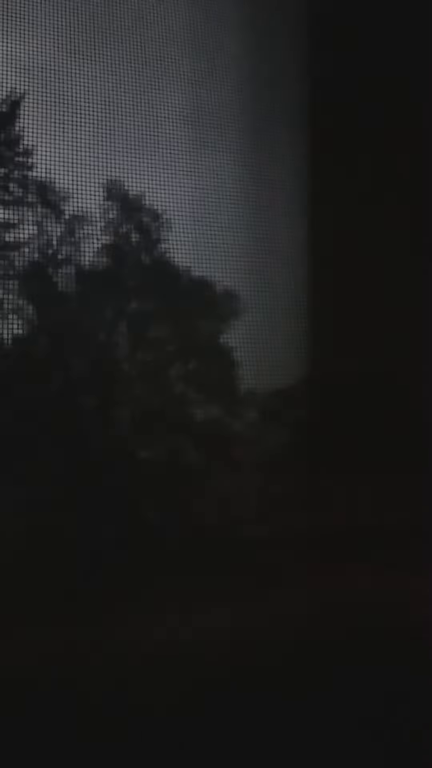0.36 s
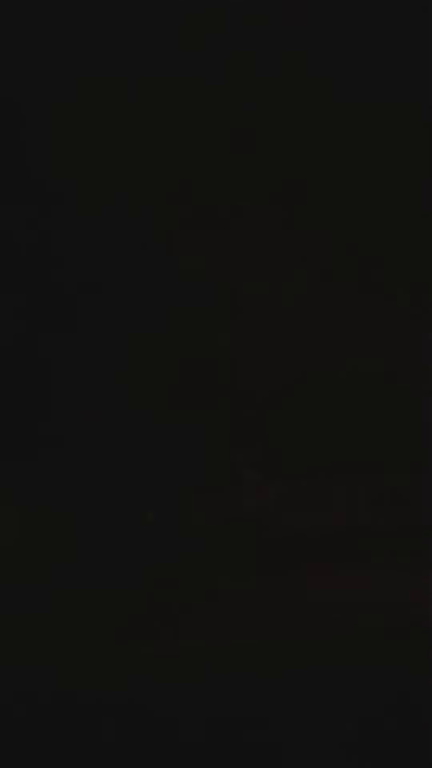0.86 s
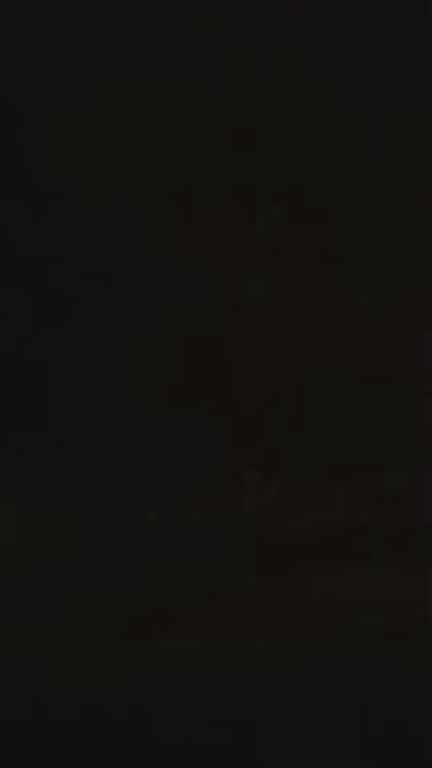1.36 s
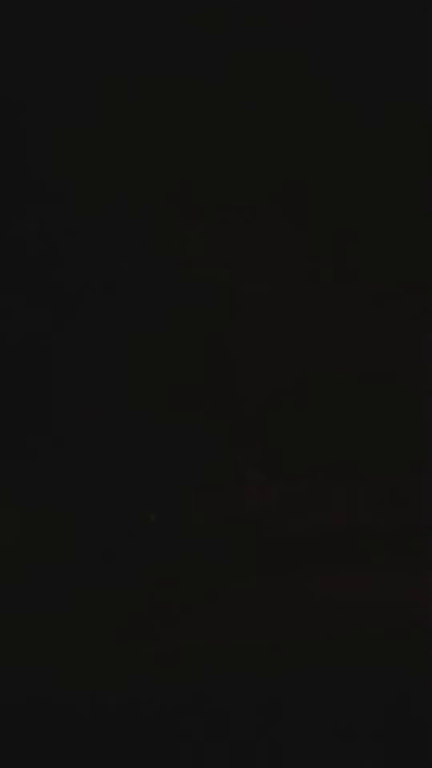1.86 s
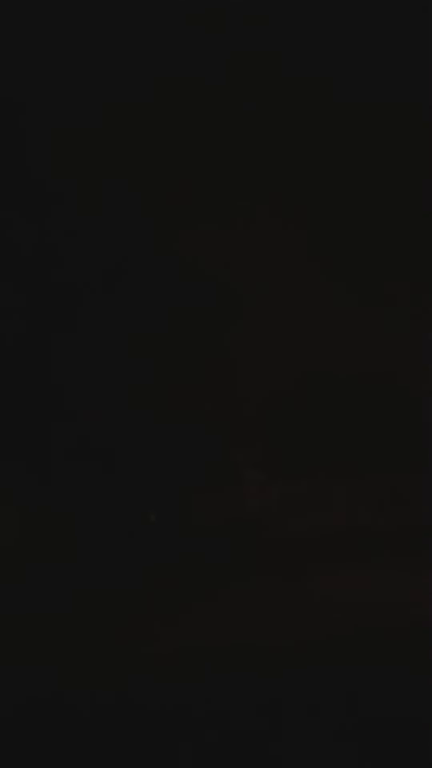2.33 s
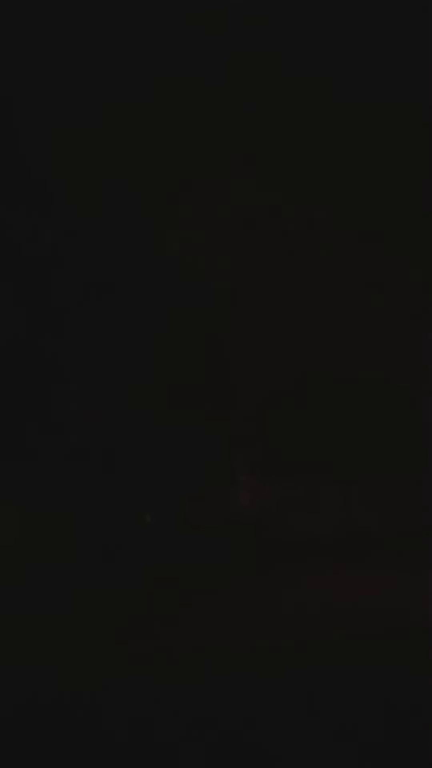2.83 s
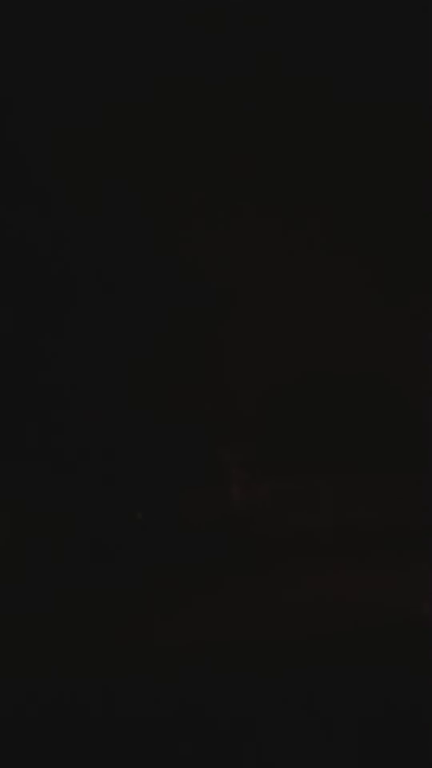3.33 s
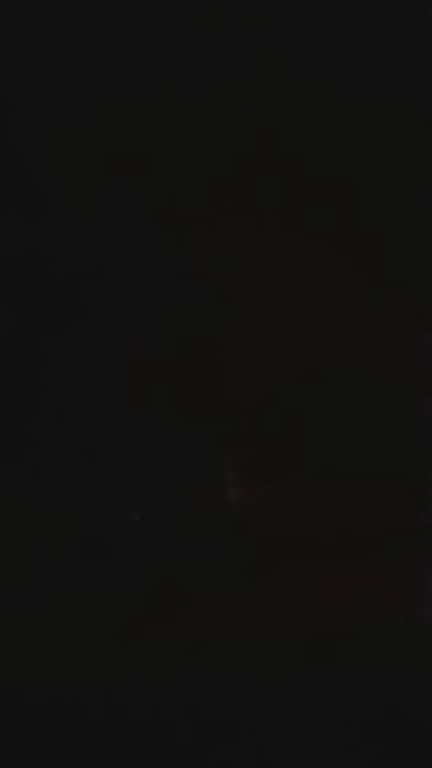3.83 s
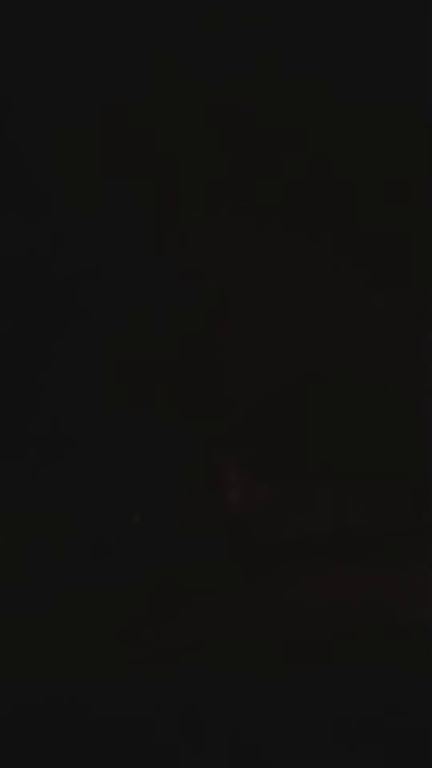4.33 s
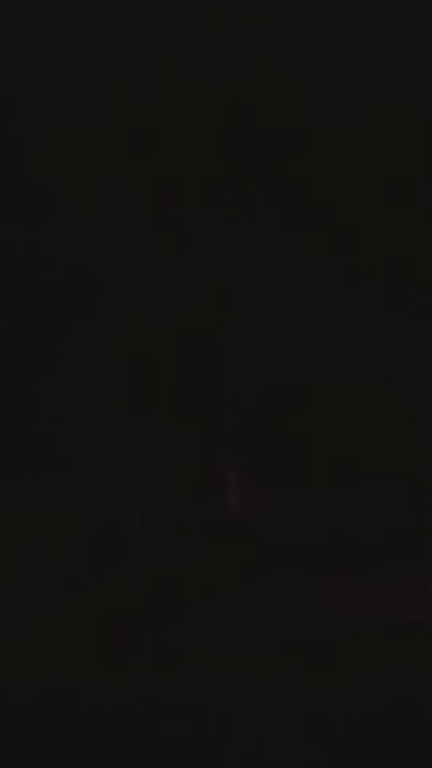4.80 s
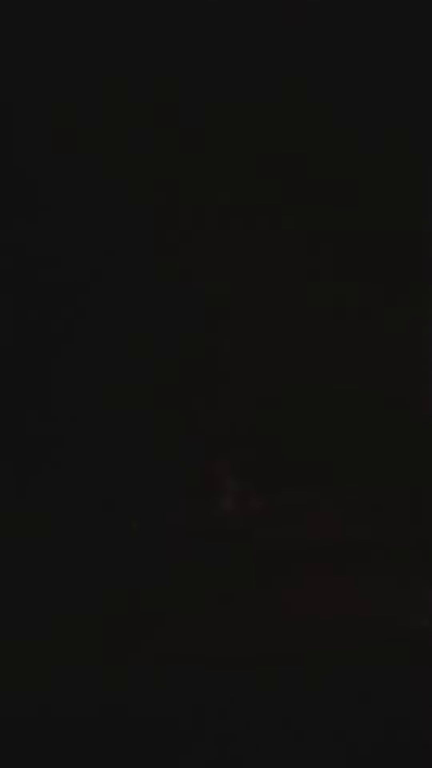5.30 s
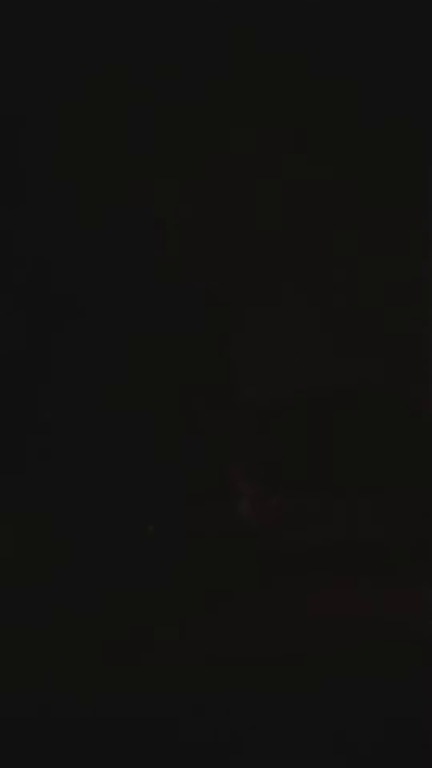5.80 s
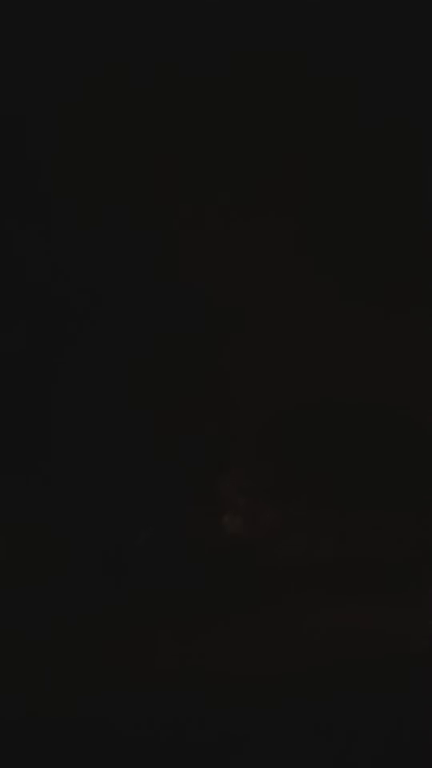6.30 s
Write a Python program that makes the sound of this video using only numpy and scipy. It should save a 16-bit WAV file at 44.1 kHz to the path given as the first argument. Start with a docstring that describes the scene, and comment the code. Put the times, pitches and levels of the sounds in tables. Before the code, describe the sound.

Night outdoors, heard in stereo from under a porch roof. Distant thunder is already rumbling at 0 s with a brief dull clap, deep and nearly centred, its highs lost to distance. Muffled thuds merge into an uneven roll, with bumps around 0.6 to 0.9 and 1.2 to 1.6 s, building to its fullest at about 2.8 to 3.5 s. It then sinks irregularly, still fluttering, before surging again after 6.2 s. Nearby, sparse raindrops click and splash, noticeably at 0.4, 2.0, 3.4, 4.5, 5.8 and 6.1 s, with small hollow taps at 0.3, 1.1, 1.8, 2.5 and 4.2 s. A very faint, fine rain hiss lies mostly left over soft microphone noise. From about 5.1 s spray swells, brightest at the end. Around 6.34 s a much stronger hollow drop knocks on the left; it stops at 6.4 s, still swelling.

```python
"""Thunder over a wet garden

Distant thunder rolls at night, heard from under a porch roof: dulled shock waves merge into a rumble.
Stray drops splash, click and tap nearby, each noise or a ring under a fast decay. A fine hiss of rain,
dense random clicks through a spectrum, lies mostly left and swells towards the end, over the noise
of two microphones."""
import sys
import numpy as np
from scipy import signal
from scipy.fft import rfft, irfft
from scipy.io import wavfile

SR = 44100
rng = np.random.default_rng(int(sys.argv[2]) if len(sys.argv) > 2 else 0)


def boost(x):
    """Linear amplitude factor 10**(x/20) for a level x in decibels (scalar or array-like)."""
    u = np.asarray(x, float) / 20
    return 10 ** u


def persist_wave(psi):
    """Save psi, clipped to +-1, as 16-bit WAV."""
    counts = np.round(np.clip(psi, -1, 1) * 32767).astype(np.int16)
    wavfile.write(sys.argv[1], SR, np.atleast_2d(counts).T)


N = 282945


def rms_one(x):
    """Scale to unit power."""
    return x / np.sqrt(np.mean(x ** 2) + 1e-20)


def in_time(rows):
    """Columns of a curve at every sample; the first column is seconds."""
    s, *columns = np.transpose(rows)
    return [np.interp(np.arange(N) / SR, s, c) for c in columns]


def at_hz(points, hz):
    """Read a spectrum on a log frequency axis."""
    points_hz, values = np.transpose(points)
    return np.interp(np.log(hz), np.log(points_hz), values)


def panned(left_minus_right_db):
    """Left and right gains for a level difference."""
    half_db = left_minus_right_db / 2
    return boost(np.array([half_db, -half_db]).reshape(2, -1))


def drift(corner_hz):
    """Slow random curve of unit rms: noise through two equal poles, at SR / 40."""
    r = np.exp(-2 * np.pi * corner_hz * 40 / SR)
    noise = rng.standard_normal(N // 40 + 2002)
    slow = rms_one(signal.lfilter([1], [1, -2 * r, r * r], noise)[2000:])
    return np.interp(np.arange(N) / 40, np.arange(len(slow)), slow)


def coloured(x, spectrum):
    """Give a broadband signal the spectrum; nothing far outside its ends."""
    hz = np.maximum(np.fft.rfftfreq(N, 1 / SR), 1)
    below, above = (spectrum[0][0] / 2, -70), (spectrum[-1][0] * 2, -70)
    return irfft(rfft(x) * boost(at_hz([below] + list(spectrum) + [above], hz)), N)


def grains(per_s, spread_db, channels):
    """Random clicks of uneven size and sign, unit rms."""
    shape = (channels, N)
    sizes = boost(spread_db * np.minimum(rng.exponential(1, shape), 4))
    signs = rng.choice([-1, 1], shape)
    return rms_one(sizes * signs * (rng.random(shape) < per_s / SR))


def dying(t60_s, rise_s):
    """Envelope of a hit: soft quick rise, exponential fall."""
    t = np.arange(SR // 3) / SR
    return (1 - np.exp(-t / rise_s)) ** 2 * boost(-60 * t / max(t60_s, .01))


def add(out, s, sound):
    """Mix a sound in at its time."""
    i = round(s * SR)
    out[:, i:i + sound.shape[1]] += sound[:, :N - i]


def ringing(noise, hz, q):
    """Noise twice through a resonance, unit rms."""
    b, a = signal.iirpeak(hz, q, fs=SR)
    return rms_one(signal.lfilter(b, a, signal.lfilter(b, a, noise)))


def hiss(spectrum):
    """Thousands of tiny drops a second, unrelated left and right."""
    return rms_one(coloured(grains(7000, 2.8, channels=2), spectrum))


def self_noise():
    """Steady coloured noise of each microphone, unrelated left and right."""
    # Each row: frequency in Hz, relative density in dB per Hz.
    noise_spectrum = [(300, 9), (1500, -8), (3000, -8), (8000, -11.5), (15500, -10.5)]
    return boost(-73.5) * rms_one(coloured(rng.standard_normal((2, N)), noise_spectrum))


def shower():
    """The far rain flickers and sways slightly; coarser drops come in flurries on both sides."""
    # Rain hiss, uneven and rising at the end. Each row: time in seconds, level in dB.
    rain_level = [(0.0, -80.5), (.9, -83), (1.23, -80.5), (1.6, -81), (1.92, -85.5), (2.45, -80),
                  (2.9, -82.5), (3.4, -80.5), (3.95, -79), (4.35, -81), (4.9, -82.5), (5.1, -80),
                  (5.5, -79), (6.42, -72)]
    # Fine rain, then coarser drops. Each row: frequency in Hz, relative density in dB per Hz.
    rain_spectrum = [(4500, -24), (5600, -13), (6300, -2), (7500, -1), (8100, -10), (8700, -23.5)]
    patter_spectrum = [(4200, -18), (5000, -5), (5700, 0), (6300, -7.5)]
    # Flurries of coarser drops. Each row: start in seconds, level in dB.
    flurry_hits = [(.42, -82), (.58, -91), (.69, -85), (.745, -86), (1.035, -84), (1.2, -80), (1.32, -85),
                   (1.54, -77), (1.98, -83), (2.2, -83), (2.53, -78), (3.14, -77), (3.21, -81), (3.39, -81),
                   (3.94, -87), (4.485, -75), (5.15, -84)]
    pan_db, sway_db, flicker_db = 10, 1.0, .6
    flurry_t60_s, flurry_rise_s, patter_floor_db = 0.35, 0.0053, -90

    level_db, = in_time(rain_level)
    flicker = flicker_db * np.array([drift(9.2), drift(6)])
    fine = hiss(rain_spectrum) * boost(level_db + flicker) * panned(pan_db + sway_db * drift(1.7))
    flurries = np.full((1, N), boost(patter_floor_db))
    for s, flurry_db in flurry_hits:
        add(flurries, s, boost(flurry_db) * dying(flurry_t60_s, flurry_rise_s)[None])
    return fine + hiss(patter_spectrum) * flurries


def gust():
    """Spray swells from nothing; its finest part comes last and almost only from the left."""
    # A gust of spray draws near. Each row: time in seconds, level in dB.
    gust_level = [(5.1, -86), (5.3, -82), (5.46, -76), (5.67, -74.5), (5.81, -71.5), (5.94, -75),
                  (6.15, -72.5), (6.31, -69.5), (6.42, -65)]
    # Main spray, then its finest part. Each row: frequency in Hz, relative density in dB per Hz.
    gust_spectrum = [(1000, -11), (1600, -7.5), (1850, -5.5), (2100, -15.5), (3200, -9), (4400, -8),
                     (4850, 1.5), (5700, 1), (6500, 0), (7600, -8), (8700, -4.5), (9200, -17)]
    spray_spectrum = [(9300, -30), (10300, -5), (11400, -1), (12900, -5), (13400, -16), (15500, -10)]
    spray_end_db, spray_rise_db_per_s, spray_floor_db = -76, 54, -96

    level_db, = in_time(gust_level)
    t = np.arange(N) / SR
    flicker_db = 0.71 * np.array([drift(9.6), drift(8.3)])
    main = hiss(gust_spectrum) * boost(level_db + flicker_db) * panned(8.5)
    swell = boost(spray_floor_db) + boost(spray_end_db - spray_rise_db_per_s * (t[-1] - t))
    finest = hiss(spray_spectrum) * swell * panned(20.6)
    started = np.clip(t - gust_level[0][0], 0, .15) / .15
    return started * (main + finest)


def ticks():
    """Small hard drops: a click through a steep band, with a few milliseconds of rattle after it."""
    # Each row: start in seconds, peak in dB ahead of panning, low edge in Hz, high edge in Hz,
    # left minus right in dB.
    tick_hits = [(0.411, -65, 1000, 5500, 2), (1.04, -64.5, 1250, 1720, 5), (1.331, -59.5, 5860, 7300, 13),
                 (1.637, -59, 1330, 1630, 1.5), (1.985, -55, 2900, 6900, 5), (2.027, -63, 5200, 7200, 2),
                 (3.3947, -56.5, 3640, 7800, 13), (3.435, -64, 4600, 5800, 6), (3.8, -59.5, 6440, 8100, 2),
                 (3.832, -60, 7150, 8850, 5), (5.783, -51, 1400, 7500, 5), (6.0806, -53, 6400, 8150, 11),
                 (6.335, -59.5, 1300, 4200, -13)]
    out = np.zeros((2, N))
    for s, peak_db, low_hz, high_hz, pan_db in tick_hits:
        strike = 0.22 * rng.standard_normal((2, SR // 3)) * dying(0.008, .0001)
        strike[:, 0] = 1
        band = signal.butter(3, [low_hz, high_hz], "band", fs=SR, output="sos")
        click = signal.sosfilt(band, strike)
        add(out, s, click / np.abs(click).max() * boost(peak_db) * panned(pan_db))
    return out


def taps():
    """Heavy drops on a hollow thing: it rings a few cycles, with a rough tail from the walls."""
    # Each row: start in seconds, level in dB, ring in Hz, rough tail against the ring in dB,
    # left minus right in dB.
    tap_hits = [(.309, -52, 700, -5, -2.5), (1.098, -58, 560, -9, .3), (1.801, -55, 608, -9, -3),
                (2.528, -54, 700, -7, -3.5), (4.189, -58, 820, -5, -2.5), (4.646, -60, 805, -5, -2.5),
                (4.862, -60, 717, -5, 1.5), (6.222, -57, 742, -6, -5), (6.3369, -35, 530, -30, -15)]
    out, t = np.zeros((2, N)), np.arange(SR // 3) / SR
    envelope = dying(.016, .0017)
    for s, level_db, hz, tail_db, pan_db in tap_hits:
        ring = np.sin(2 * np.pi * hz * t) * envelope / envelope.max()
        tail = ringing(rng.standard_normal((2, len(t))), hz, 2.39) * dying(0.26, 0.0027)
        add(out, s, (ring + boost(tail_db) * tail) * boost(level_db) * panned(pan_db))
    return out


def drops():
    """A burst of noise dying under the porch roof: two rings of the surface hit, and a broad splash."""
    # Each row: start in seconds, level in dB, high ring in Hz, high ring against low in dB, T60 in seconds.
    drop_hits = [(0.412, -62.5, 4100, -8.5, 0.13), (.531, -71.5, 4500, -7, .12),
                 (0.579, -69.5, 6450, -5, 0.24), (0.741, -69, 6500, 1, 0.22),
                 (1.0412, -68.5, 6630, 1, 0.076), (1.984, -81, 3340, 9, .09),
                 (2.4245, -68.5, 3240, -3.5, .16), (2.524, -69, 5800, -8, .14),
                 (2.548, -70, 2030, -6, 0.24), (3.227, -66.5, 1900, -21, 0.24),
                 (3.869, -72.5, 7000, -4, 0.1), (3.942, -72, 6630, 6, 0.15), (4.486, -63, 6430, -3, 0.12),
                 (4.866, -76, 2190, 0, 0.16), (5.028, -69, 2300, -15, .076), (5.394, -73, 1900, -10, .13),
                 (5.54, -77, 1990, -4, 0.27), (5.784, -67.5, 1760, -3, 0.1), (6.389, -61, 2070, -11, 0.081)]
    low_hz, pan_db = 1026, -1
    splash_db, splash_follows_bright, splash_pole = -1.5, 0.37, 0.45
    out = np.zeros((2, N))
    band = signal.butter(5, [900, 7300], "band", fs=SR, output="sos")
    for s, level_db, high_hz, bright_db, t60_s in drop_hits:
        noise = rng.standard_normal((3, 2, SR // 3))
        low = ringing(noise[0], low_hz, 2.13)
        high = boost(bright_db) * ringing(noise[1], high_hz, 6.2)
        dulled = signal.lfilter([1], [1, -splash_pole], noise[2])
        splash = rms_one(signal.sosfilt(band, dulled))
        splash = splash * boost(splash_db + splash_follows_bright * bright_db)
        add(out, s, (low + high + splash) * dying(t60_s, 0.00014) * boost(level_db) * panned(pan_db))
    return out


def rolling_db(octave, level_db, waver_db):
    """Level of one register: the roll tilted by brightness or weight, the claps that reach it, a waver."""
    # The roll builds until about 3.4 s, sinks unevenly, then surges again at the end.
    # Each row: time in seconds, level in dB, brightness in dB per octave, weight of the deep bass in dB.
    roll = [(0.0, -61, -7.5, 7), (.3, -55.5, 3, 2), (.5, -59.5, 1, 6), (.97, -58.5, -0.5, 6),
            (1.15, -55.5, 2, 6), (1.37, -54.5, 2, 4), (1.65, -49.5, -1, -1), (2.05, -56.5, 2.5, 5.5),
            (2.16, -51, -2, -1), (2.5, -51, 2.5, 4.5), (2.85, -48, -1.5, -1), (3.4, -47.5, -0.5, -3),
            (3.62, -51, -0.5, 5.5), (3.8, -51.5, -1, -5), (4.3, -50, -1, -0.5), (5.0, -52, 0.5, -0.5),
            (5.5, -52, -5.5, -1), (5.72, -53.5, 3.5, -1.5), (6.04, -55, -2, -6), (6.21, -58.5, 5.5, 9),
            (6.26, -51.5, 0.5, -2), (6.42, -50.5, 1.5, -1)]
    # Claps within the roll, strong and faint. Each row: peak time in seconds, lift in dB at the centre,
    # fall time in seconds, centre in octaves above the body.
    clap_hits = [(0.04, 14.5, 0.035, 0.8), (0.243, 3, .05, 1), (0.62, 9.5, 0.11, 2), (0.852, 12, 0.021, 0),
                 (1.117, 8.5, 0.038, 0.3), (1.192, 11, 0.035, 1.5), (1.453, 13.5, 0.051, 0.36),
                 (1.51, 4.5, 0.028, -0.5), (1.567, 11, 0.04, 0.73), (1.822, 5, 0.086, 2),
                 (2.214, 14, 0.015, -0.5), (2.321, 6.5, 0.033, 1.3), (2.476, 8, 0.028, -3.5),
                 (2.91, 7.5, 0.041, 1.5), (3.016, 6, 0.019, -0.3), (3.194, 5.5, 0.07, 0),
                 (3.39, 3, .03, 2.5), (3.508, 11, 0.06, 0.1), (3.732, 4, 0.035, 0), (3.906, 8, 0.054, 0),
                 (4.22, 5, 0.08, -0.5), (4.53, 7.5, 0.044, 0.3), (4.72, 6.5, 0.018, 1.5),
                 (4.856, 7, 0.034, -0.5), (4.953, -2, 0.052, -6), (5.243, 1.5, 0.029, 6),
                 (5.51, 6.5, 0.085, -1.5), (5.89, 8, 0.023, -0.5), (5.976, 7.5, 0.028, 0.5),
                 (6.114, 10.5, 0.052, 0.1), (6.263, 12, .025, -1.5), (6.352, 5, 0.023, -0.3)]
    reach_octaves, rise_to_fall, waver_corner_hz = 1.08, 0.87, 6.4

    roll_db, tilt_db, weight_db = in_time(roll)
    tilted_db = roll_db + (weight_db if octave < -1 else tilt_db * octave)
    t = np.arange(0, N, 32) / SR
    claps_db = np.zeros(len(t))
    for s, lift_db, fall_s, centre in clap_hits:
        time_scale_s = np.where(t < s, rise_to_fall * fall_s, fall_s)
        distance = ((octave - centre) / reach_octaves) ** 2 + ((t - s) / time_scale_s) ** 2
        claps_db += lift_db * np.exp(-distance)
    claps_db = np.interp(np.arange(N) / SR, t, claps_db)
    return tilted_db + level_db + claps_db + waver_db * drift(waver_corner_hz)


def thunder():
    """Shocks from each kink of the channel arrive at random over their diffuse echo; air ate the highs."""
    # Each row: frequency in Hz, relative density in dB per Hz.
    rumble_spectrum = [(18, -44), (25, -13.5), (36, -15), (48, -2), (90, -7.5), (170, -2.5), (215, -5),
                       (260, -15.5), (400, -14.5), (500, -22), (700, -29), (900, -38.5), (1400, -57.5)]
    # Each row: frequency in Hz, left-right likeness from 0 to 1.
    likeness = [(30, 0.91), (45, 0.95), (70, .96), (140, 0.99), (330, 0.93), (500, 0.84), (800, .45),
                (1300, 0.29)]
    # Each row: frequency in Hz, left minus right in dB.
    rumble_pan = [(60, -1.5), (200, -1), (330, 0.5), (700, -4)]
    # Air resonances of the porch. Each row: frequency in Hz, width in Hz, lift in dB.
    porch = [(49.8, 18, 3.5), (116.2, 5.6, 6.5), (170.3, 20.4, 4.5), (222, 20, -2), (301.7, 73, 3.5),
             (433.5, 46, 4.5), (735.4, 26, 7.5)]
    # Deep, body, upper and crest bands. Each row: place in octaves for tilt and claps,
    # level against the roll in dB, wavering in dB.
    registers = [(-1.43, -9.5, 0.5), (-0.5, -0.18, 1), (1.03, -7.5, 1.43), (0.5, -21.5, 3.5)]

    direct = .15    # share of power
    shocks = np.sqrt(direct) * grains(150, 1.88, channels=1)
    shocks = shocks + np.sqrt(1 - direct) * rng.standard_normal(N)
    mid, side = coloured(np.vstack([shocks, rng.standard_normal(N)]), rumble_spectrum)

    hz = np.maximum(np.fft.rfftfreq(N, 1 / SR), 1)
    alike = np.clip(at_hz(likeness, hz), 0, 1)
    pair = np.sqrt(1 + alike) * rfft(mid) + np.sqrt(1 - alike) * rfft(side) * [[1], [-1]]
    pair = pair * panned(at_hz(rumble_pan, hz))
    porch_db = sum(lift_db / (1 + (2 * (hz - at) / width) ** 2) for at, width, lift_db in porch)
    pair = pair * boost(porch_db)

    deep = 1 / (1 + (hz / 95) ** 8)
    upper = 1 / (1 + (265 / hz) ** 8)
    crest = 1 / (1 + (570 / hz) ** 10)
    power_shares = deep, np.maximum(1 - deep - upper, 0), upper * (1 - crest), crest
    out = np.zeros((2, N))
    for share, register in zip(power_shares, registers):
        out += rms_one(irfft(pair * np.sqrt(share), N)) * boost(rolling_db(*register))
    return out


def scene():
    """Rain hiss, a gust of spray, ticks, taps, drops and thunder."""
    return shower() + gust() + ticks() + taps() + drops() + thunder()


def top_cut(x):
    """Nothing passes above the cut-off."""
    return signal.sosfilt(signal.butter(12, 15630, fs=SR, output="sos"), x)


def record(dry):
    """Each microphone adds its own noise."""
    return top_cut(dry + self_noise())


dry = scene()
out = record(dry)
persist_wave(out)
```